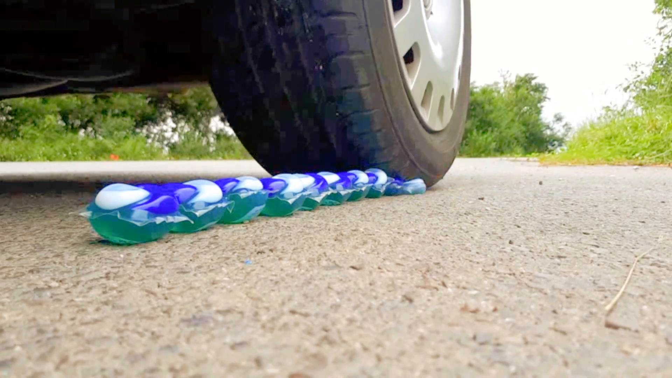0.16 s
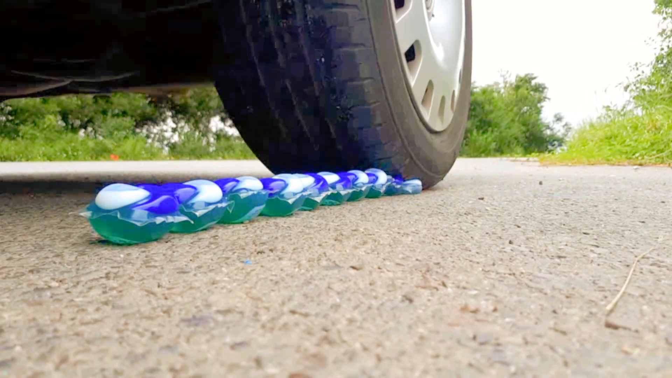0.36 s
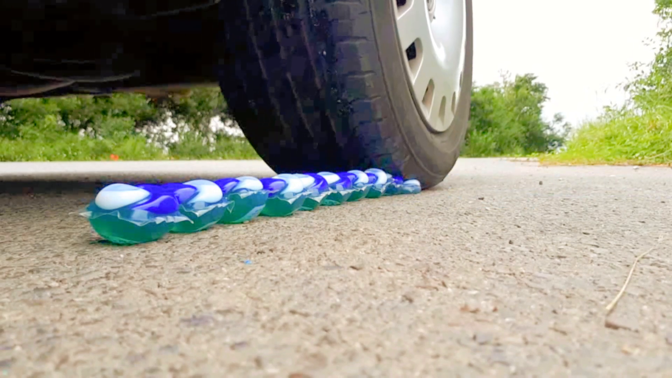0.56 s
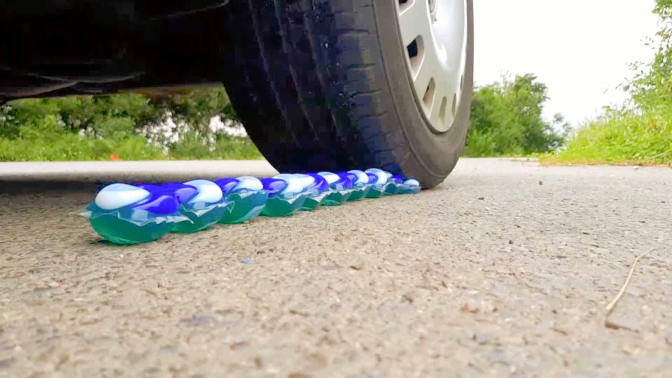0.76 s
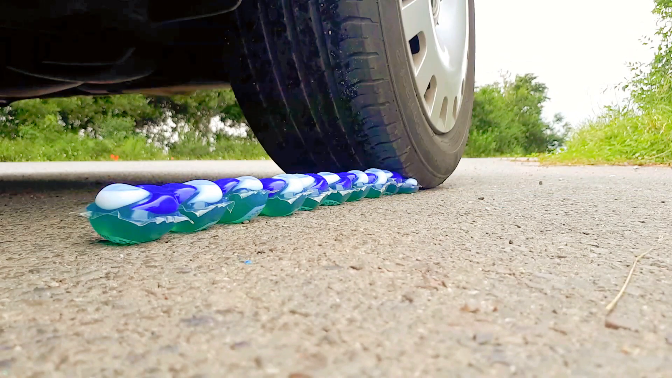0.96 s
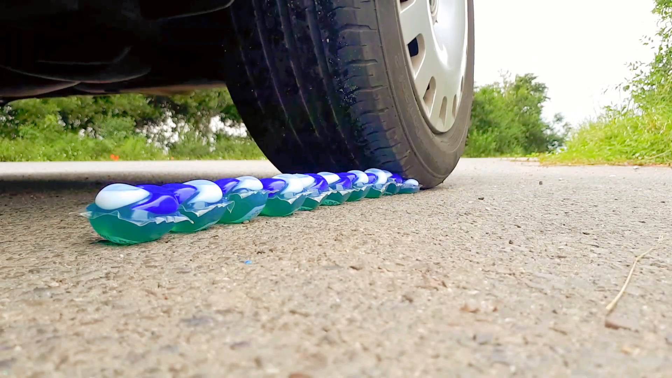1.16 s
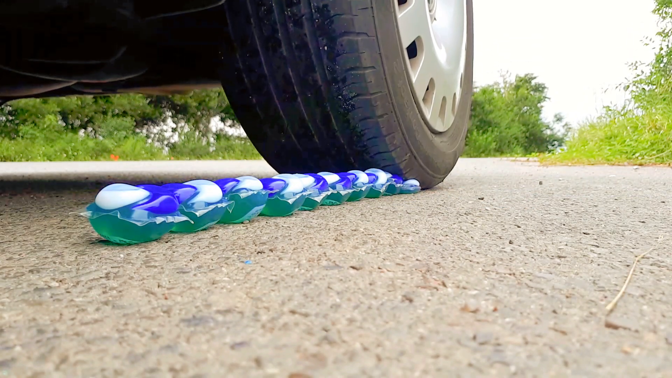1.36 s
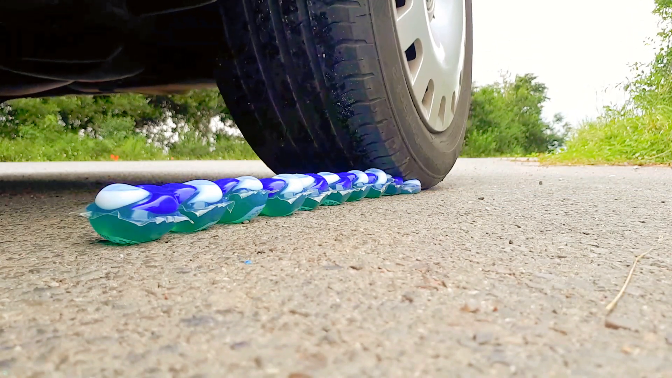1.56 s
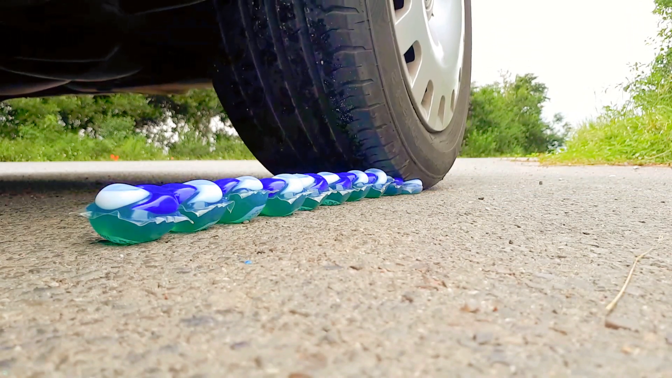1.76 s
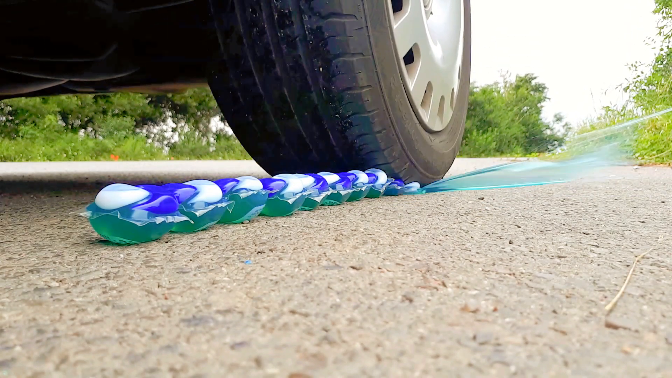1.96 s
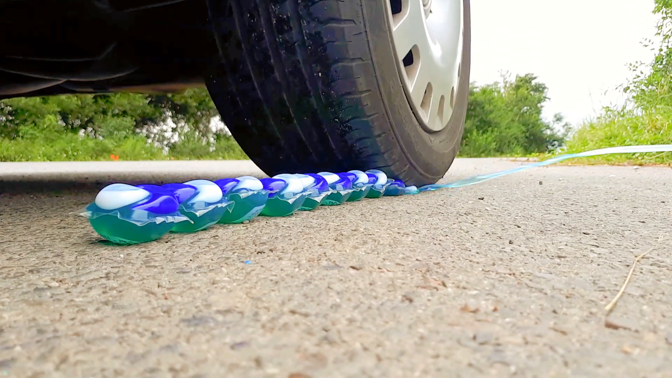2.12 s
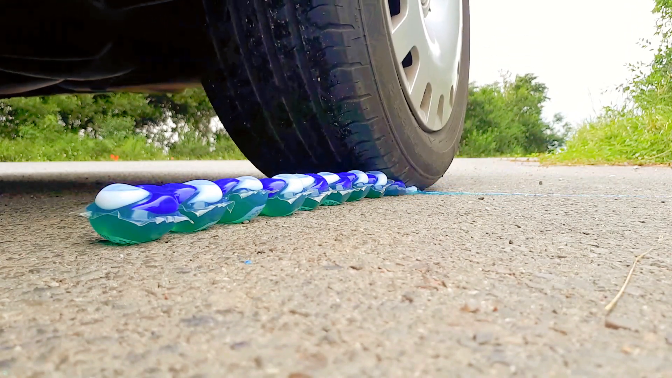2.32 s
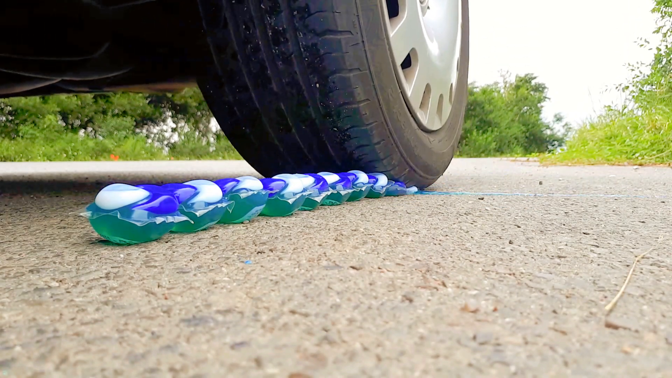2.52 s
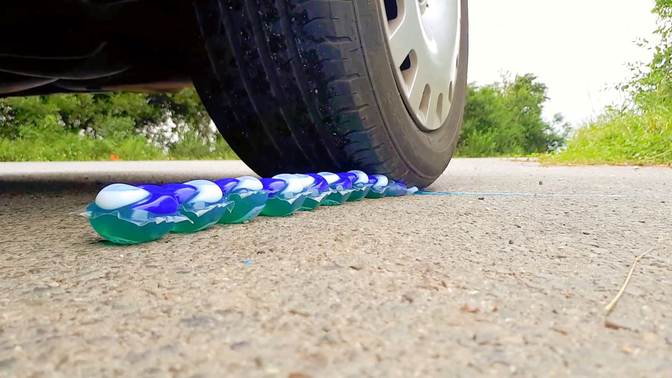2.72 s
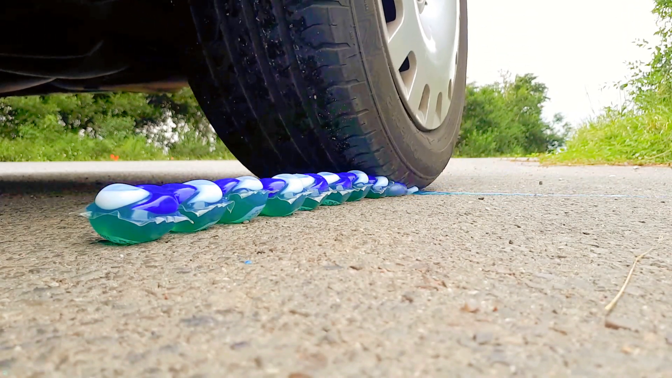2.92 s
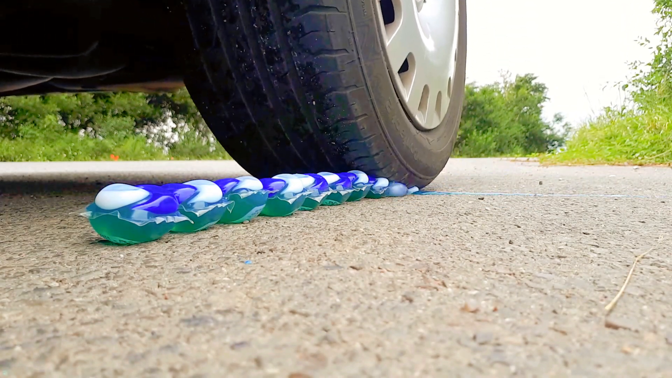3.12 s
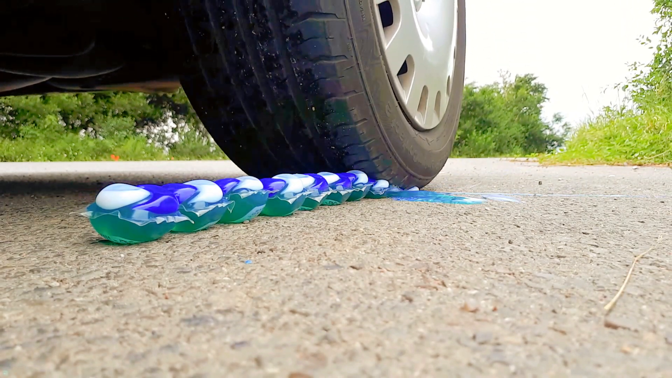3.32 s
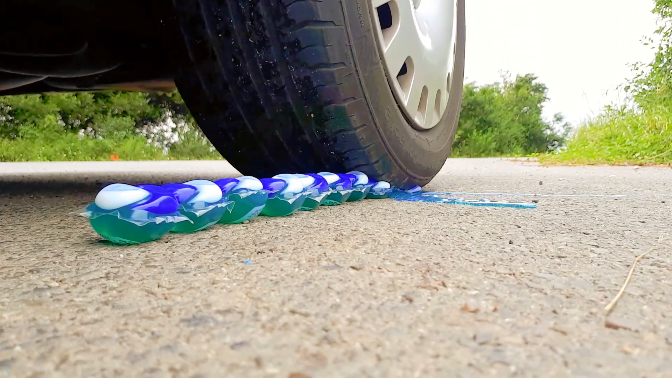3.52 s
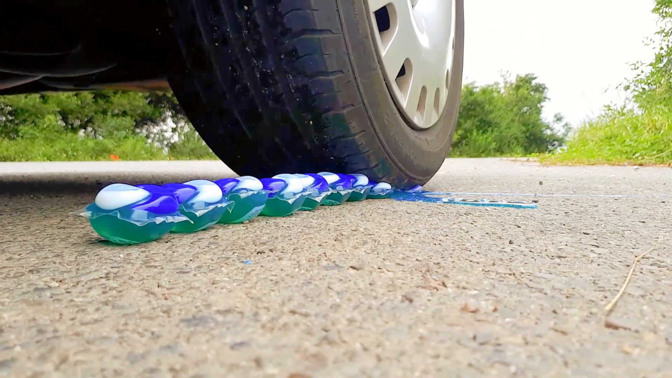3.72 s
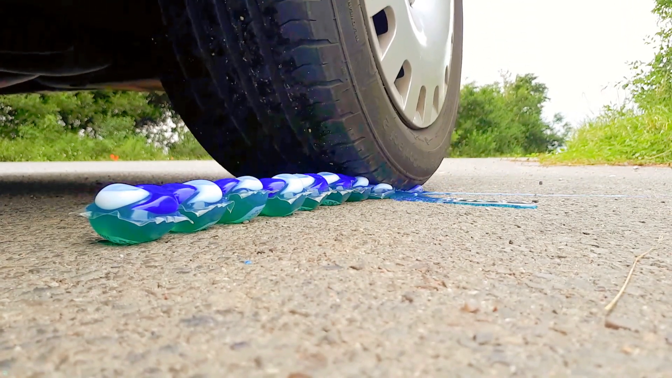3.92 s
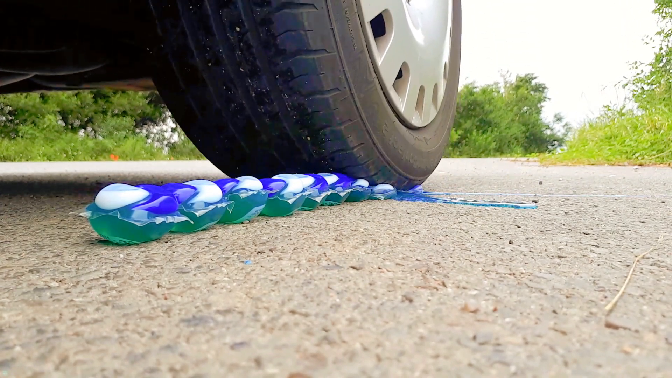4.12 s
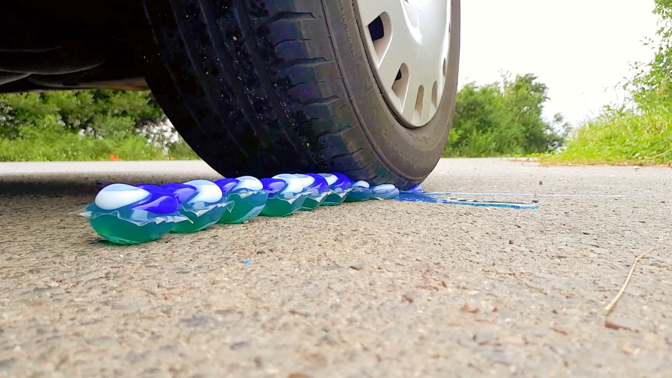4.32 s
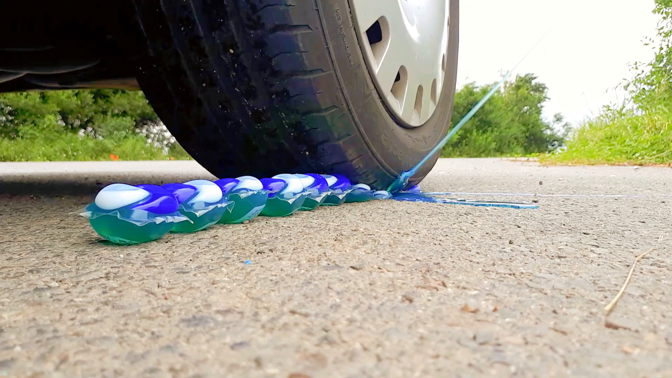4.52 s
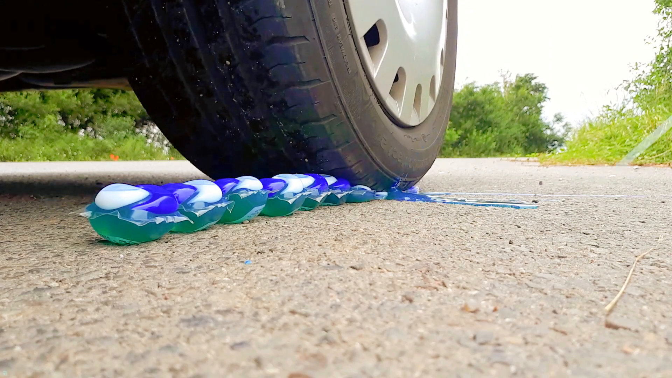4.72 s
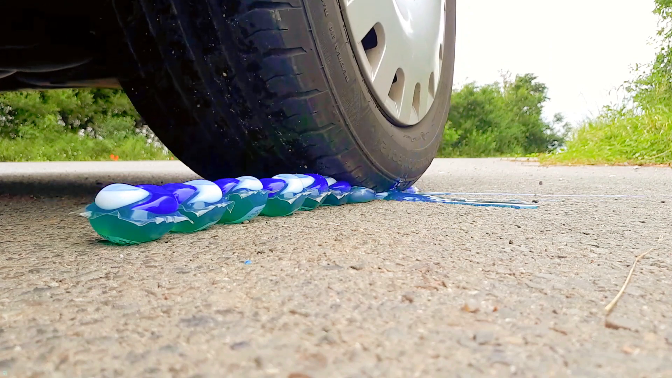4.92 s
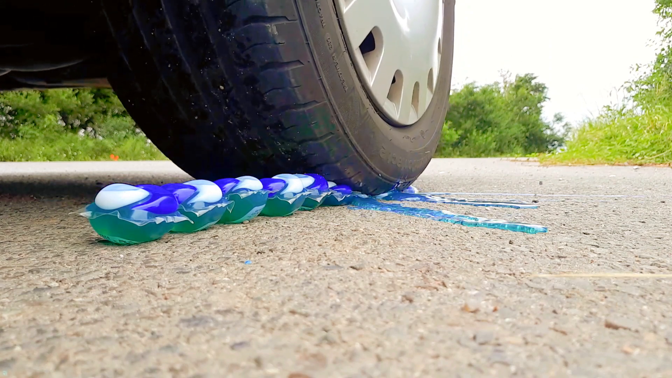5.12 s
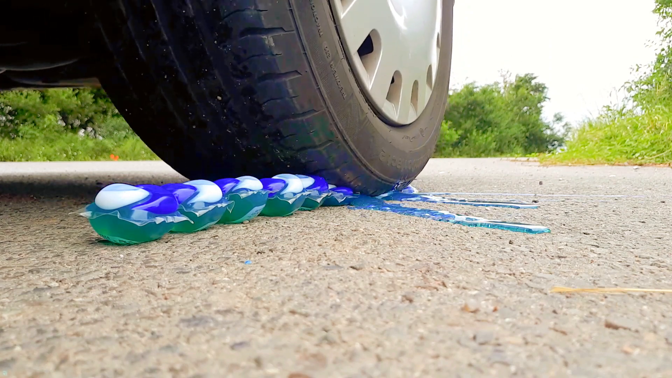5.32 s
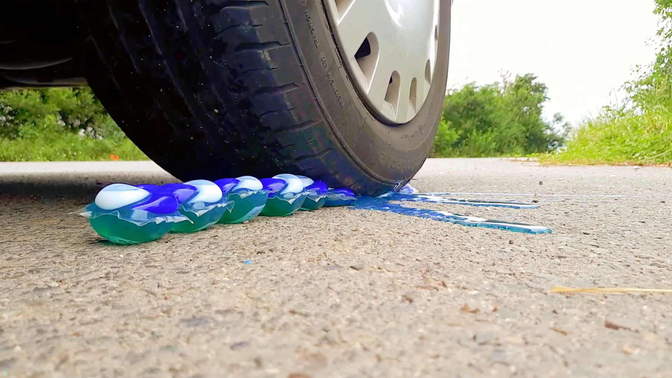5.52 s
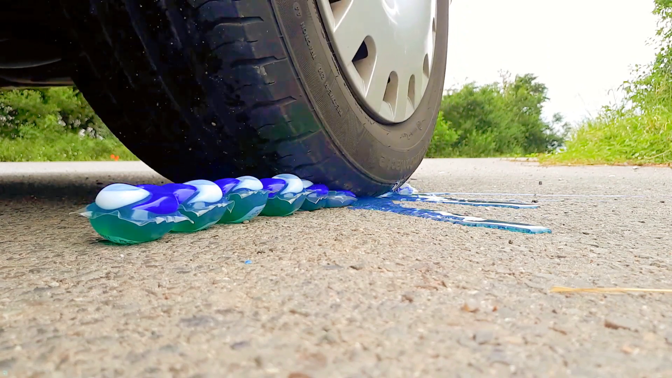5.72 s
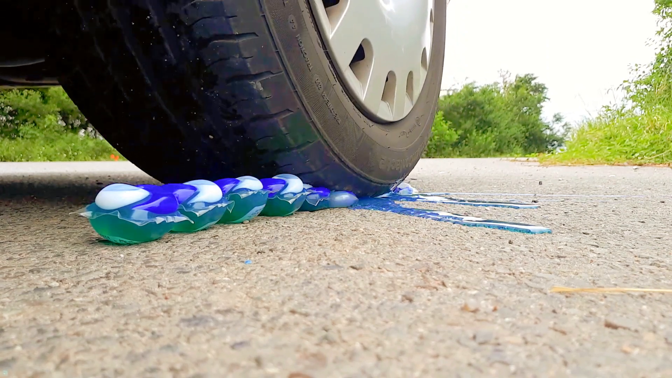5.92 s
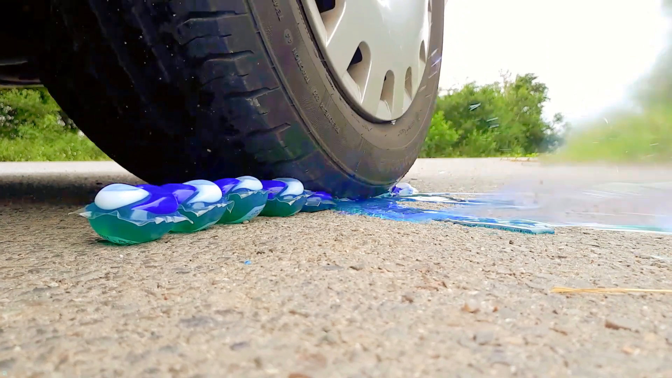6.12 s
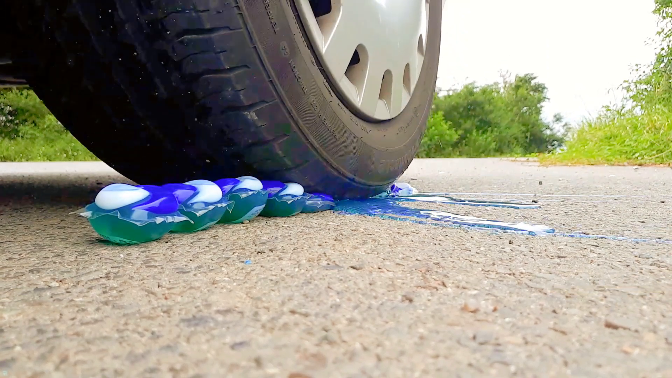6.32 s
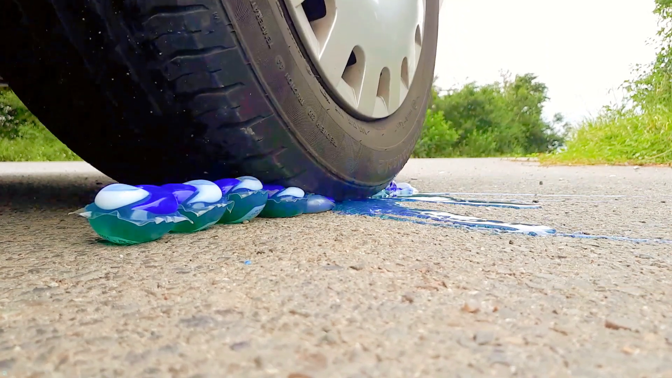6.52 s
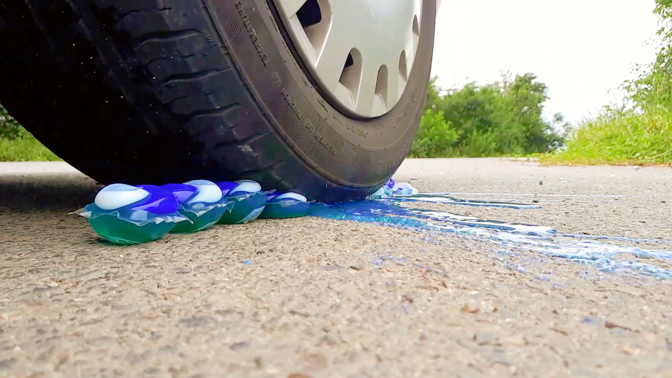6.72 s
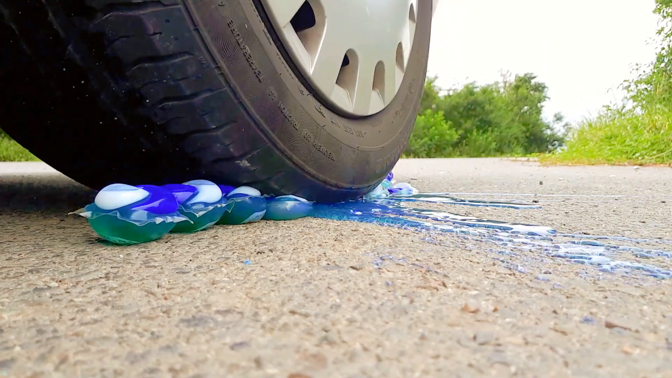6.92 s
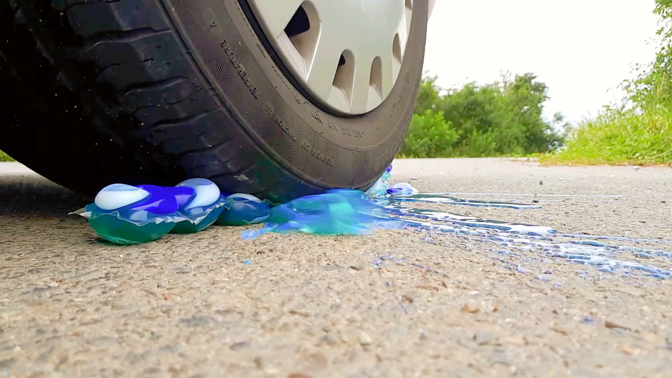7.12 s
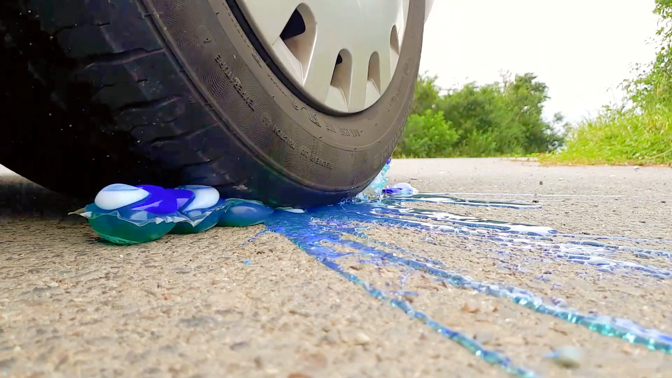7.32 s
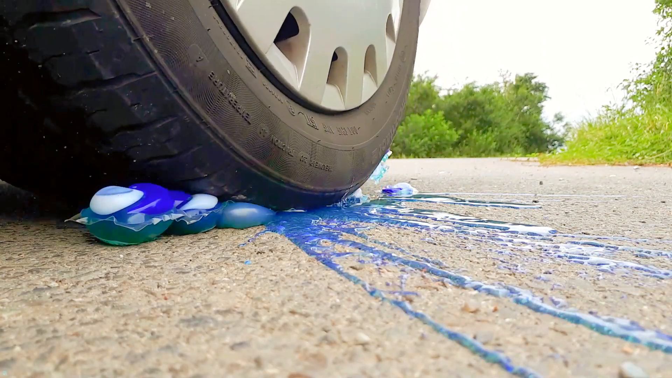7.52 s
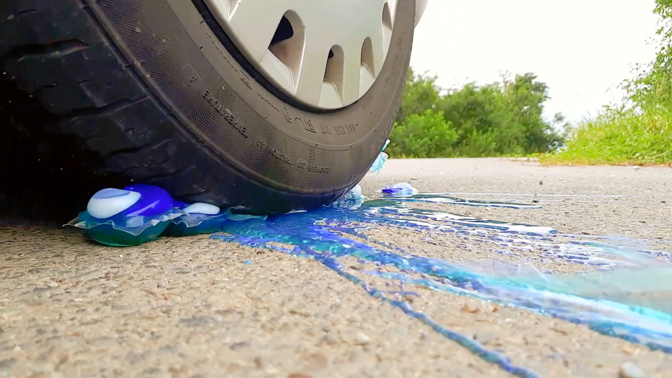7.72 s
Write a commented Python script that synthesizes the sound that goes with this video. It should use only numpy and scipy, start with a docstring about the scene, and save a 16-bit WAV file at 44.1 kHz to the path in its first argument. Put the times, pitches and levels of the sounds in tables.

```python
"""A car tyre creeps over a row of liquid-filled pods on asphalt, close to the left microphone.
The pods crack open; some throw a jet, ring hollow or echo as a rising chirp from the wedge between tyre
and road, and the tyre and the gap under the car ring after them. Between pops, wet film and grit crunch
and foam fizzes and spits, over rolling rumble, faint engine hum and soft background noise. The right
microphone gets only a dull trace of the tyre and takes the wind. A faint hiss lies on both sides."""
import sys
import numpy as np
from scipy import signal
from scipy.fft import rfft, irfft, next_fast_len
from scipy.io import wavfile
from scipy.ndimage import uniform_filter1d, map_coordinates

SR = 44100
rng = np.random.default_rng(int(sys.argv[2]) if len(sys.argv) > 2 else 0)


def pcm_store(signal):
    """Save signal as 16-bit PCM."""
    levels = np.round(np.clip(np.atleast_2d(signal), -1, 1) * 32767)
    wavfile.write(sys.argv[1], SR, levels.astype(np.int16).T)


N = 346846

# Pod film splits. Each row: start in seconds, peak in dB, relative treble lift and tyre thump in dB.
FILM_SPLITS = [(1.771, -1, 20, -42), (1.779, -4.5, 15.5, -46), (3.1043, -9, 3, -35),
               (4.1419, -0.5, 17.5, -33), (4.1505, -9.5, 16, -40.5), (4.844, -6.5, -19.5, -39),
               (4.858, -9, -14, -44.5), (5.8680, -2, 0, -31), (5.877, -6.5, -3.5, -36.5),
               (6.412, -4.5, -3.5, -31.5), (6.9343, -4, -4, -34.5), (7.4569, 0, 1.5, -27.5)]
# Cracks echo from the wedge between tyre and road. Each row: start in seconds, peak in dB, first and
# last pitch in Hz, length in seconds, crest as a share of the length, click in dB.
RISING_CHIRPS = [(3.1066, -9, 1120, 2800, 0.0043, 0.26, -19), (4.8454, -6.5, 950, 3700, .0037, 0.47, -35.5),
                 (4.859, -7, 946, 3710, 0.0045, 0.46, -42), (5.868, -5.5, 1374, 4000, 0.0027, 0.32, -24),
                 (5.8777, -6.5, 1490, 3700, .003, 0.32, -25), (5.8866, -10, 1636, 2900, 0.0038, .4, -27),
                 (6.4139, -1.5, 1183, 2620, .0042, 0.27, -29.5),
                 (6.9367, -4.5, 1398, 2190, 0.0056, 0.39, -19),
                 (6.9425, -10, 1440, 2250, 0.0066, 0.63, -29.5),
                 (7.459, -8, 1230, 2744, 0.00506, 0.69, -35)]
# Liquid jets out. Each row: start in seconds, level in dB, hold and 60 dB decay in seconds.
LIQUID_JETS = [(1.775, -22, 0.0052, 0.15), (1.782, -21, 0.0057, 0.048), (4.144, -26, 0.005, 0.035),
               (4.152, -17.5, 0.0061, 0.086), (4.185, -36.5, 0.023, 0.072), (5.889, -33, 0.0054, 0.063)]
# Burst pods ring hollow; blasts of air shove the left microphone.
# Each row: start in seconds, peak in dB, pitch in Hz, 60 dB decay in seconds.
POD_HOLLOWS = [(1.773, -22.5, 901, 0.074), (1.78, -25, 1805, .1), (3.109, -21.5, 896, 0.048),
               (3.112, -38, 1770, 0.18), (4.154, -20, 2045, 0.095), (4.862, -33, 620, 0.1),
               (5.872, -22, 2030, 0.071)]
AIR_SHOVES = [(1.770, -22, 111.9, 0.078), (4.1389, -14, 104.2, 0.092)]
# Tyre wall, tyre air and underbody. Each row: pitch in Hz, relative level in dB, 60 dB decay in seconds.
TYRE_MODES = [(87.06, -3, 0.73), (106.55, -3.5, 0.54), (162, -7.5, .5), (232, -11, 0.66), (322, -0.5, .27),
              (668, 0, 0.11), (890, -0.5, 0.086)]
# Liquid slaps down. Each row: start in seconds, level in dB, centre in Hz, width in octaves,
# length in seconds.
LIQUID_SPLATS = [(4.198, -34, 810, 0.36, 0.038), (4.842, -52, 13600, 0.18, 0.02),
                 (5.155, -47.5, 1084, 1, 0.006), (5.646, -53.5, 1160, 0.69, 0.0096),
                 (5.705, -57, 1105, 0.54, .0056), (5.884, -27.5, 670, 0.61, 0.012),
                 (5.991, -46, 3600, 0.58, .003), (6.088, -40, 5640, 0.29, 0.0094),
                 (6.096, -38.5, 11820, 0.23, 0.0062), (6.141, -49.5, 5100, 0.35, 0.01),
                 (7.197, -52, 960, 0.52, 0.036)]
# The tread presses wet film and grit. Each row: peak time in seconds, relative crunch and rasp in dB,
# rise and fall in seconds.
TREAD_SQUEEZES = [(0.189, -60.5, -63.5, 0.061, 0.014), (0.294, -62, -61.5, 0.045, 0.022),
                  (1.366, -62, -63, 0.0079, 0.07), (1.493, -59.5, -62, 0.0085, 0.09),
                  (2.389, -76, -92, .006, 0.046), (2.432, -76, -90, .006, .07),
                  (2.598, -58, -71, 0.02, .025), (2.621, -59, -65, .05, 0.067),
                  (5.095, -58.5, -65, 0.014, .19), (5.172, -52, -63.5, 0.072, 0.07),
                  (5.362, -47.5, -62, 0.056, 0.06), (5.535, -53.5, -58.5, 0.14, .07),
                  (5.585, -46, -57, 0.11, 0.055), (5.727, -46.5, -66.5, 0.02, 0.1),
                  (5.782, -50.5, -59.5, 0.087, 0.14), (5.992, -55, -54, .09, 0.2),
                  (6.109, -55.5, -59.5, .11, 0.17), (6.602, -58.5, -73, 0.027, 0.03),
                  (6.739, -62, -68, .04, 0.06), (7.749, -51.5, -66, 0.09, 0.25),
                  (7.848, -40.5, -50, 0.028, 0.12)]
# Spray lands. Each row: burst time and flight in seconds, relative crunch, rasp and fizz in dB.
SPRAY_LANDINGS = [(1.771, 0.13, -56.5, -64.5, -79), (3.106, .18, -64.5, -83.5, -83),
                  (4.143, 0.13, -56, -72, -79), (5.867, 0.077, -47.5, -64.5, -76.5),
                  (6.409, 0.092, -57, -62, -63.5), (6.936, 0.11, -57, -58, -67.5),
                  (7.456, .105, -54.5, -60, -66.5)]
# Foam wells out. Each row: peak time in seconds, relative level in dB, rise and fall in seconds.
FOAM_SWELLS = [(6.025, -60.5, 0.051, 0.13), (6.14, -55, 0.047, 0.035), (7.724, -69, 0.02, 0.24)]
# Blisters burst. Each row: start in seconds, peaks of the thin tick and the lower click in dB.
FOAM_SPITS = [(6.074, -25, -39), (6.111, -31, -48), (6.4923, -35, -41.5), (6.510, -36, -48),
              (6.7129, -27, -39.5), (6.9909, -20, -50.5), (7.002, -12, -51), (7.106, -60, -42.5),
              (7.112, -42, -60)]
# Pinholes whistle. Each row: start in seconds, relative level in dB, first and last pitch in Hz,
# length in seconds.
PINHOLE_WHISTLES = [(5.436, -55, 2830, 2480, 0.12), (5.961, -59, 6060, 6570, 0.039),
                    (5.996, -54.5, 8550, 8250, 0.056), (6.048, -49, 7500, 6360, 0.037),
                    (6.659, -69.5, 2017, 2110, .28), (7.711, -53.5, 11370, 9730, 0.013)]
# Gusts bump the right microphone. Each row: peak time in seconds, level in dB, centre in Hz.
WIND_GUSTS = [(0.2, -51, 109), (0.271, -49, 102), (0.44, -44, 100), (0.535, -50, 125), (0.73, -42, 147),
              (0.81, -41, 111), (1.076, -43, 102), (1.199, -43, 93), (1.409, -46, 97), (2.459, -54.5, 117),
              (2.878, -47, 149), (3.335, -45.5, 137), (3.605, -35, 134), (3.655, -41, 158),
              (3.708, -37, 138), (3.782, -37, 99), (3.98, -33.5, 113.5), (4.091, -40, 116),
              (4.26, -38.5, 144), (4.62, -40.5, 157), (4.69, -41.5, 167), (5.359, -42, 122),
              (5.658, -36.5, 135), (6.738, -42.5, 145), (7.121, -42.5, 140), (7.48, -42, 148)]

# Level curves. Each row: time in seconds, relative level in dB.
ROLL_LEVEL = [(0.0, -59.5), (0.75, -53), (1.08, -62.5), (1.405, -57), (2.21, -65), (2.37, -77), (2.55, -73),
              (2.59, -58), (2.7, -59.5), (2.76, -72), (3.08, -70), (3.305, -53), (4.12, -48.5),
              (4.355, -58.5), (5.83, -50.5), (6.37, -56.5), (7.855, -50.5)]
WIND_LEVEL = [(0.0, -64), (0.16, -53), (0.62, -57.5), (0.72, -39.5), (0.83, -51), (0.96, -57.5),
              (1.54, -55.5), (1.96, -60.5), (2.1, -80.5), (2.4, -71), (2.44, -60.5), (3.1, -54),
              (3.24, -43.5), (3.66, -40), (3.88, -48.5), (4.38, -51.5), (4.68, -45), (5.24, -57.5),
              (5.94, -40.5), (6.12, -60.5), (7.86, -44.5)]
ENGINE_LEVEL = [(0, -87), (4.5, -74), (6, -64.5), (7.86, -67.5)]
BACKGROUND_LEVEL = [(0, -74), (1.75, -75.5), (2.5, -84), (3.08, -87), (3.25, -68), (3.5, -77), (4.1, -71.5),
                    (4.45, -79.5), (4.95, -69), (6.3, -78.5), (7.85, -68.5)]
HISS_LEVEL = [(0, -72.5), (1.7, -73), (2.1, -80.5), (3.1, -83), (3.4, -73.5), (4.1, -72.5), (4.4, -80.5),
              (7.9, -79)]

# Spectra of the sources and their paths. Each row: frequency in Hz, relative level in dB.
CRACK_SPECTRUM = [(30, -29.5), (150, -14), (500, -4), (1100, 0.5), (2200, 3), (4200, -15.5), (5500, -24),
                  (8300, -48), (13000, -37), (16000, -48.5)]
CLICK_SPECTRUM = [(600, -23.5), (2500, -6.5), (3600, 1), (6000, -9.5), (8500, -32), (16000, -31.5)]
JET_SPECTRUM = [(60, -15), (500, -7), (1000, -7), (2200, -1), (3250, 0), (3850, -19), (4600, -11.5),
                (5500, -13.5), (6100, -24), (7200, -22), (8700, -32), (12500, -28), (16000, -32.5)]
CRUNCH_SPECTRUM = [(200, -28), (400, -2.5), (580, 1.5), (750, 0), (950, 2), (1400, -4.5), (2000, 0),
                   (2800, -1.5), (3700, -8.5), (5000, -29.5), (8000, -60.5)]
RASP_SPECTRUM = [(2000, -38), (3600, 4.5), (5000, -1), (6000, -13), (7000, -24.5), (11000, -46.5)]
FOAM_SPECTRUM = [(4000, -35.5), (6500, -7.5), (8500, -15.5), (12500, 0.5), (15500, 0), (17000, -12.5)]
TICK_SPECTRUM = [(6000, -43), (10500, -4.5), (13500, 6.5)]
ROLL_SPECTRUM = [(20, -15), (45, -6), (85, 4), (115, -0.5), (160, -7), (200, -14), (235, -11.5), (290, -19),
                 (420, -27), (900, -44.5), (2000, -70)]
WIND_SPECTRUM = [(20, -17.5), (45, -4), (90, 4.5), (130, 2.5), (190, -7.5), (300, -27.5), (600, -62)]
EDDY_SPECTRUM = [(90, -25.5), (170, 4), (230, -0.5), (300, -1.5), (450, -20.5), (650, -39.5), (1500, -66)]
BACKGROUND_SPECTRUM = [(200, -8.5), (500, 1.5), (1000, 0.5), (2000, -1), (3000, -4.5), (4000, -14),
                       (5500, -23.5), (8000, -51.5)]
HISS_SPECTRUM = [(100, 11.5), (700, 7.5), (5000, -2), (8500, 1), (15000, -0.5)]
GAP_RESPONSE = [(40, -1), (120, 6), (250, 0.5), (320, 6), (450, -6.5), (660, -5), (890, -5), (1100, -3.5),
                (1800, -11), (2300, -11), (2850, -11), (13000, -10)]  # between road and car
FAR_RESPONSE = [(80, -16.5), (300, -21), (700, -30.5), (2000, -36), (12000, -42.5)]  # from the tyre to the right microphone
# The echo under the car. Each row: frequency in Hz, 60 dB decay in seconds.
GAP_T60 = [(80, 0.37), (250, 0.21), (500, 0.22), (1200, 0.1), (2000, 0.091), (4000, 0.14), (13000, 0.11)]

PULSE_HZ = np.fft.rfftfreq(2048, 1 / SR)


def cracks(tear_db=-27, tear_s=0.004):
    """The stretched film tears for a few milliseconds, then lets go in one pressure pulse."""
    out = np.zeros(N)
    treble = along([(2200, 0.011), (3900, 0.5), (5200, 1.15), (8000, 1.1)], PULSE_HZ)
    rise = np.linspace(0, 1, int(tear_s * SR))
    tearing = coloured(rng.standard_normal(N), JET_SPECTRUM)
    for s, db, treble_db, _ in FILM_SPLITS:
        add(out, s, amp(db) * pulse(along(CRACK_SPECTRUM, PULSE_HZ) + treble_db * treble))
        add(out, s - tear_s, amp(db + tear_db) * rise * tearing[round(s * SR):][:len(rise)])
    return out


def chirps(overtone_db=-32, fullness=0.64):
    """A click and a quick rising chirp follow the crack: its echo from the wedge of tyre and road."""
    out = np.zeros(N)
    click = pulse(along(CLICK_SPECTRUM, PULSE_HZ))
    for s, db, start_hz, end_hz, length, crest, click_db in RISING_CHIRPS:
        progress = np.linspace(0, 1, int(length * SR))
        phase = 2 * np.pi * np.cumsum(start_hz + (end_hz - start_hz) * progress) / SR
        envelope = np.interp(progress, [0, crest, 1], [0, 1, 0]) ** fullness
        add(out, s, -amp(db) * envelope * (np.sin(phase) + amp(overtone_db) * np.sin(2 * phase)))
        add(out, s + 0.5 / start_hz, amp(click_db) * click)
    return out


def jets(attack_s=0.0012):
    """The hardest bursts throw a spattering jet that holds briefly and dies."""
    envelope, t = np.zeros(N), np.arange(SR // 3) / SR
    spatter = coloured(grains(rate=4600, spread_db=1.5, smooth=0.79), JET_SPECTRUM)
    for s, db, hold, t60 in LIQUID_JETS:
        add(envelope, s, amp(db - 60 * np.maximum(t - hold, 0) / t60) * (1 - np.exp(-t / attack_s)))
    return envelope * spatter


def rings(rows):
    """A pod's hollow or the air-shoved microphone rings with one tone that starts at once and dies."""
    out, t = np.zeros(N), np.arange(SR // 4) / SR
    for s, db, hz, t60 in rows:
        add(out, s, amp(db - 60 * t / t60) * np.sin(2 * np.pi * hz * t))
    return out


def tyre_ring(gain_db=-4, scatter_db=2.5, attack_s=0.0014):
    """Each burst knocks the tyre and the underbody into ringing."""
    out, t = np.zeros(N), np.arange(SR) / SR
    for s, _, _, thump_db in FILM_SPLITS:
        ring = np.zeros(SR)
        for hz, db, t60 in TYRE_MODES:
            decay = amp(db + scatter_db * rng.normal() - 60 * t / t60)
            ring += decay * np.sin(2 * np.pi * (hz * t + rng.random()))
        add(out, s, amp(thump_db + gain_db) * ring * (1 - np.exp(-t / attack_s)))
    return out


def gap_echo(x, delay_s=0.002):
    """Sound bounces between road and car; the tail changes every half second as the wheel moves on."""
    out, step = np.zeros(N), SR // 2
    for start in range(0, N, step):
        hz, t, noise = signal.stft(rng.standard_normal(step), SR, nperseg=256)
        t60 = along(GAP_T60, hz)[:, None]
        equal_energy = np.sqrt(2 * np.log(1000) / (t60 * SR))
        tail = signal.istft(noise * amp(-60 * t / t60) * equal_energy, SR, nperseg=256)[1]
        add(out, start / SR + delay_s, signal.fftconvolve(x[start:start + step], tail))
    return filtered(out, lambda hz: amp(along(GAP_RESPONSE, hz)))


def crunch_and_fizz(crunch_gain_db=-0.5, rasp_gain_db=-3.5, fizz_gain_db=3.5):
    """Wet film and grit crunch and rasp under the tread, spray lands after bursts, and foam fizzes."""
    power = np.zeros((3, N))
    for s, crunch_db, rasp_db, rise, fall in TREAD_SQUEEZES:
        power[:2] += np.outer(amp([crunch_db, rasp_db]), swell(s, rise, fall)) ** 2
    for s, flight, *levels_db in SPRAY_LANDINGS:
        landing = swell(s + flight, rise=1.3 * flight, fall=0.8 * flight, cusp=1.1)
        power += np.outer(amp(levels_db), landing) ** 2
    for s, db, rise, fall in FOAM_SWELLS:
        power[2] += (amp(db) * swell(s, rise, fall)) ** 2
    crunch, rasp, fizz = np.sqrt(power)
    grit = grains(rate=1700, spread_db=4.5, smooth=0.78) * amp(2.9 * wobble(110))
    bubbles = grains(rate=1000, spread_db=4.3, smooth=0.5) * amp(1.3 * wobble(79))
    return (amp(crunch_gain_db) * crunch * squelch(coloured(grit, CRUNCH_SPECTRUM))
            + amp(rasp_gain_db) * rasp * coloured(grit[::-1], RASP_SPECTRUM)
            + amp(fizz_gain_db) * fizz * coloured(bubbles, FOAM_SPECTRUM))


def squelch(x, depth_db=2):
    """Wet pockets under the tread colour x with narrow resonances that form and fade at random."""
    spectrogram = signal.stft(x, nperseg=512)[2]
    bands = uniform_filter1d(rng.standard_normal(spectrogram.shape), size=3, axis=0)
    resonances = unit(uniform_filter1d(bands, size=14, axis=1))
    return unit(signal.istft(spectrogram * amp(depth_db * resonances), nperseg=512)[1][:N])


def snaps(over_crunch_db=11, reference_s=0.074, octaves=0.71, length_share=0.022):
    """The film snaps as each squeeze peaks: harder and shorter if it is quick, higher if it is raspy."""
    rows = []
    for s, crunch_db, rasp_db, rise, fall in TREAD_SQUEEZES:
        length = rise + fall
        db = crunch_db + over_crunch_db - 20 * np.log10(length / reference_s)
        hz = 2630 * amp(rasp_db - crunch_db) ** 0.42
        rows.append((s, db, hz, octaves, length_share * length))
    return puffs(rows)


def spits():
    """Blisters in the foam burst with single sharp ticks."""
    out = np.zeros(N)
    tick, click = pulse(along(TICK_SPECTRUM, PULSE_HZ)), pulse(along(CLICK_SPECTRUM, PULSE_HZ))
    for s, tick_db, click_db in FOAM_SPITS:
        add(out, s, amp(tick_db) * tick + amp(click_db) * click)
    return out


def whistles(sputter_db=4, fullness=0.54, waver=0.064):
    """Liquid under pressure forces through pinholes in thin, sliding, sputtering whistles."""
    out = np.zeros(N)
    for s, db, start_hz, end_hz, length in PINHOLE_WHISTLES:
        progress = np.linspace(0, 1, int(length * SR))
        unsteady = unit(uniform_filter1d(rng.standard_normal(len(progress)), size=40))
        hz = (start_hz + (end_hz - start_hz) * progress) * (1 + waver * unsteady)
        envelope = np.abs(np.sin(np.pi * progress ** 0.62)) ** fullness
        add(out, s, amp(db) * envelope * np.sin(2 * np.pi * np.cumsum(hz) / SR))
    return out * unit(amp(sputter_db * wobble(250)))


def roll(gain_db=-1.5):
    """The rolling tyre rumbles, low and uneven."""
    return amp(gain_db) * fader(ROLL_LEVEL) * rumble(ROLL_SPECTRUM, flutter_db=2.5, rate=25)


def wind(lumps_db=1.0, strong_db=-42, eddy_db=-10, steepness=1.1, gust_octaves=0.56, gust_s=0.037):
    """Breeze rumbles on the microphone; its higher eddies grow faster than it does; gusts bump on top."""
    strength = fader(WIND_LEVEL) * amp(lumps_db * wobble(16))
    eddy_gain = amp(strong_db + eddy_db) * (strength / amp(strong_db)) ** steepness
    eddies = eddy_gain * rumble(EDDY_SPECTRUM, flutter_db=8.6, rate=16)
    bumps = puffs([(s - gust_s / 3, db, hz, gust_octaves, gust_s) for s, db, hz in WIND_GUSTS])
    return strength * rumble(WIND_SPECTRUM, flutter_db=1.0, rate=25) + eddies + bumps


def engine_hum(hz=226, drift=0.008, waver_db=2.5):
    """One faint, slightly unsteady tone of the idling engine grows as the car nears."""
    phase = 2 * np.pi * np.cumsum(hz * (1 + drift * wobble(4.5))) / SR
    return fader(ENGINE_LEVEL) * unit(amp(waver_db * wobble(6.7)) * np.sin(phase))


def background():
    """A soft, even background noise, mostly on the left, sinks after the loud pops and returns."""
    return fader(BACKGROUND_LEVEL) * coloured(rng.standard_normal(N), BACKGROUND_SPECTRUM)


def hiss(opens_s=0.683, dull_hz=7540):
    """A faint hiss comes and goes on both sides; it is dull at first, then opens abruptly."""
    noise = coloured(rng.standard_normal((2, N)), HISS_SPECTRUM)
    dull = filtered(noise, lambda hz: hz < dull_hz)
    return fader(HISS_LEVEL) * np.where(np.arange(N) / SR < opens_s, dull, noise)


def pulse(level_db, ring_hz=4300, width_hz=3000):
    """A causal pressure pulse with this spectrum, peak 1; the film holds its treble back a cycle or two."""
    cepstrum = irfft(np.log(amp(level_db)))
    causal = np.arange(len(cepstrum)) < len(cepstrum) // 2
    lag = 2 * np.arctan2(PULSE_HZ * width_hz, ring_hz ** 2 - PULSE_HZ ** 2)
    pressure = irfft(np.exp(rfft(2 * cepstrum * causal) - 1j * lag))
    return pressure / np.abs(pressure).max()


def puffs(rows):
    """Short puffs of noise, each in its own band and peaking a third of the way through its length."""
    out, t = np.zeros(N), np.arange(SR // 4) / SR
    for s, db, centre_hz, octaves, length in rows:
        age = 3 * t / length
        envelope = age * np.exp(1 - age)
        puff = envelope * filtered(rng.standard_normal(len(t)), lambda hz: bell(hz, centre_hz, octaves))
        add(out, s, amp(db) * np.linalg.norm(envelope) * puff / np.linalg.norm(puff))
    return out


def grains(rate, spread_db, smooth):
    """Random clicks of uneven size, rate a second, over a share of smooth noise."""
    clicks = (rng.random(N) < rate / SR) * rng.choice([-1, 1], N)
    sizes = amp(spread_db * np.clip(rng.standard_normal(N), -2, 2))
    return unit(clicks * sizes) + smooth * rng.standard_normal(N)


def rumble(spectrum, flutter_db, rate):
    """Lumpy noise with this spectrum, at rms 1."""
    return coloured(rng.standard_normal(N) * amp(flutter_db * wobble(rate)), spectrum)


def swell(s, rise, fall, cusp=1.15):
    """A gain that peaks at s, 20 dB down one rise before and one fall after; a lower cusp is sharper."""
    t = np.arange(N) / SR - s
    return amp(-20 * np.maximum(-t / rise, t / fall) ** cusp)


def wobble(rate):
    """A smooth random curve, rate knots a second."""
    return map_coordinates(rng.standard_normal(int(N * rate / SR) + 4), [np.arange(N) * rate / SR])


def fader(curve):
    """One gain per sample from a level curve."""
    return amp(np.interp(np.arange(N) / SR, *np.transpose(curve)))


def filtered(x, response):
    """x through a response given as a function of Hz."""
    n = x.shape[-1]
    padded = next_fast_len(n + SR // 4)
    return irfft(rfft(x, padded) * response(np.fft.rfftfreq(padded, 1 / SR)), padded)[..., :n]


def coloured(x, spectrum):
    """x shaped by a spectrum, at rms 1."""
    return unit(filtered(x, lambda hz: amp(along(spectrum, hz))))


def along(points, hz):
    """Interpolate (Hz, value) points on a log axis."""
    knots_hz, values = np.transpose(points)
    return np.interp(np.log(hz + 1), np.log(knots_hz + 1), values)


def bell(hz, centre_hz, octaves):
    """A bell curve over log frequency, peak 1."""
    return np.exp(-0.5 * (np.log2((hz + 1) / centre_hz) / octaves) ** 2)


def amp(db):
    """Decibels to gain."""
    return 10 ** (np.asarray(db) / 20)


def unit(x):
    """Scale to rms 1."""
    return x / np.sqrt(np.mean(x ** 2) + 1e-20)


def add(track, s, sound):
    """Mix a sound into the track at time s."""
    part = track[max(round(s * SR), 0):][:len(sound)]
    part += sound[:len(part)]


def scene(far_delay_s=0.00009, far_echo_db=-28.5):
    """The left microphone has the tyre side; the right gets wind and a faint, dull copy a moment later."""
    pops = cracks() + chirps() + jets()
    near = pops + gap_echo(pops) + puffs(LIQUID_SPLATS) + spits() + whistles()
    near += crunch_and_fizz() + snaps() + background() + tyre_ring() + rings(POD_HOLLOWS)
    left = near + rings(AIR_SHOVES) + engine_hum() + roll()
    far = filtered(near, lambda hz: amp(along(FAR_RESPONSE, hz)) * np.exp(-2j * np.pi * hz * far_delay_s))
    right = far + amp(far_echo_db) * gap_echo(pops) + wind()
    return np.array([left, right]) + hiss()


def record(dry, dip_hz=8400, dip_db=-4, dip_octaves=0.32, top_hz=16100):
    """Both microphones have one dip in the treble and cut off steeply at their band limit."""
    dip = lambda hz: amp(dip_db * bell(hz, dip_hz, dip_octaves))
    band = lambda hz: 1 / (1 + (hz / top_hz) ** 120)
    return filtered(dry, lambda hz: dip(hz) * band(hz))


dry = scene()
out = record(dry)
pcm_store(out)
```